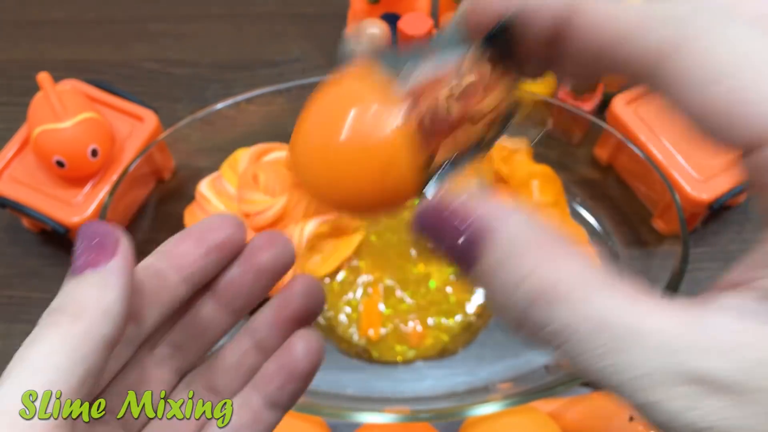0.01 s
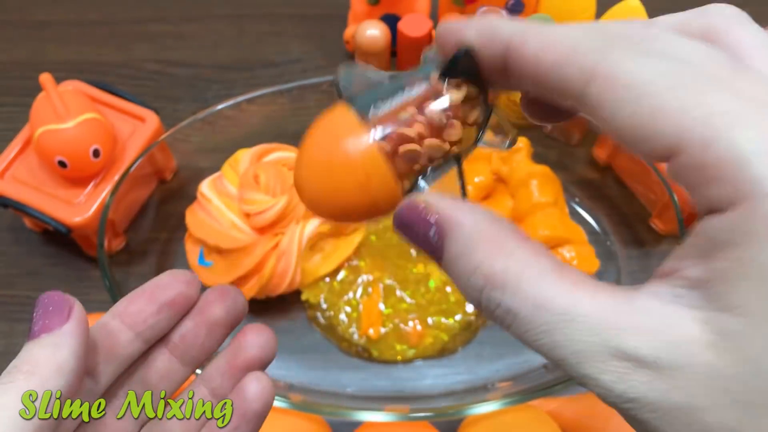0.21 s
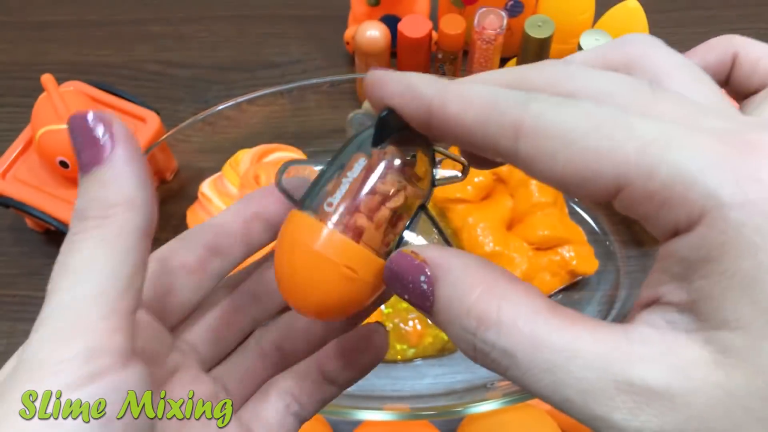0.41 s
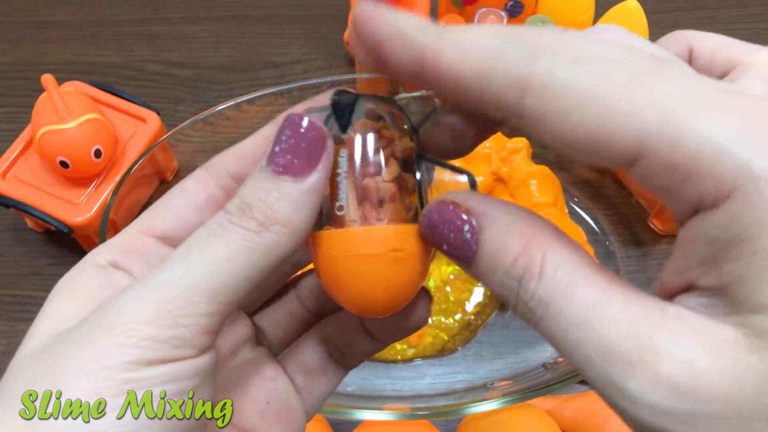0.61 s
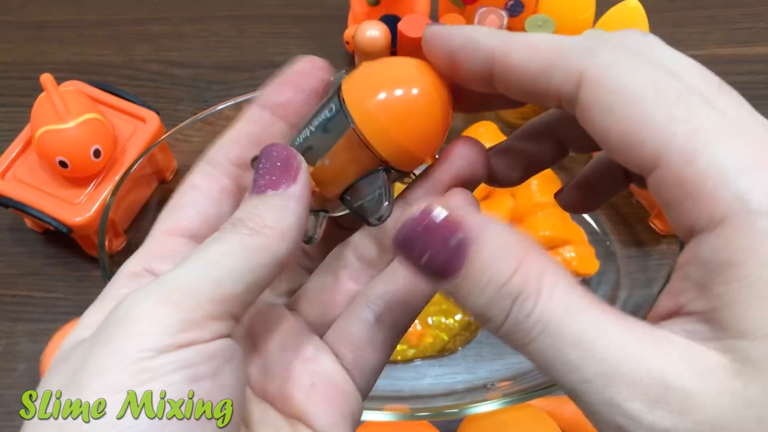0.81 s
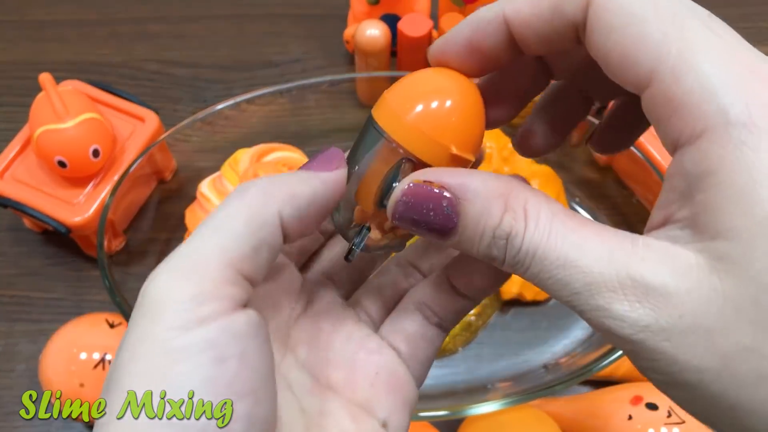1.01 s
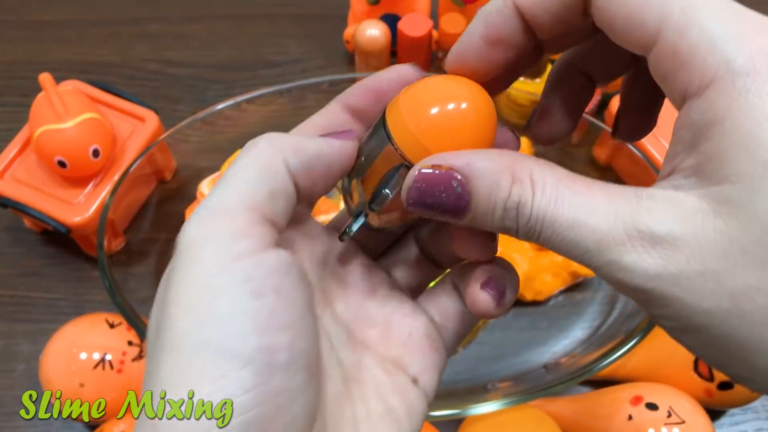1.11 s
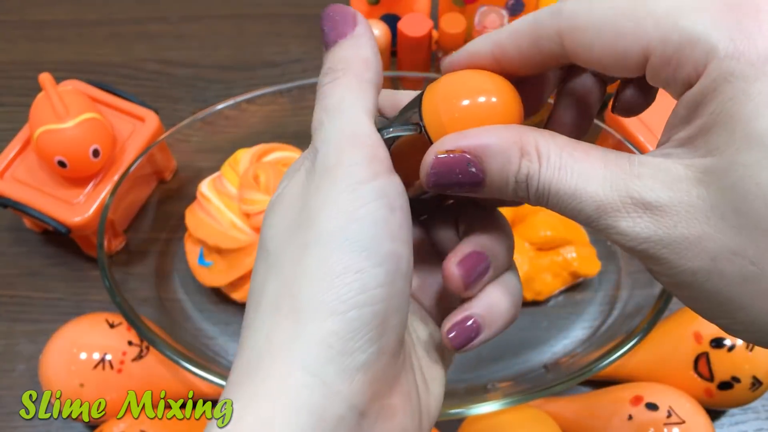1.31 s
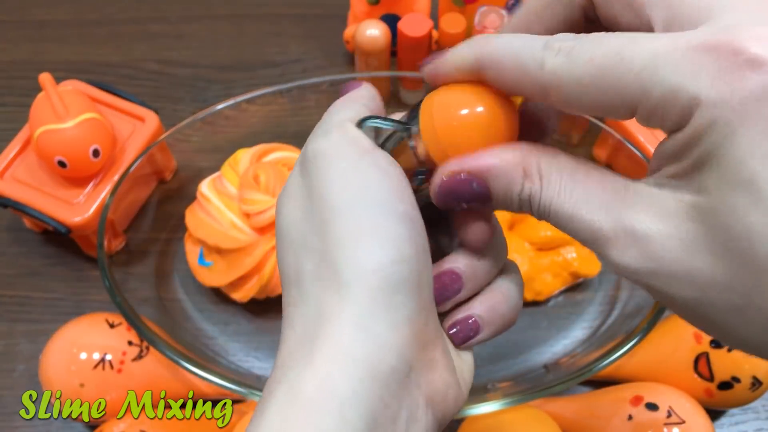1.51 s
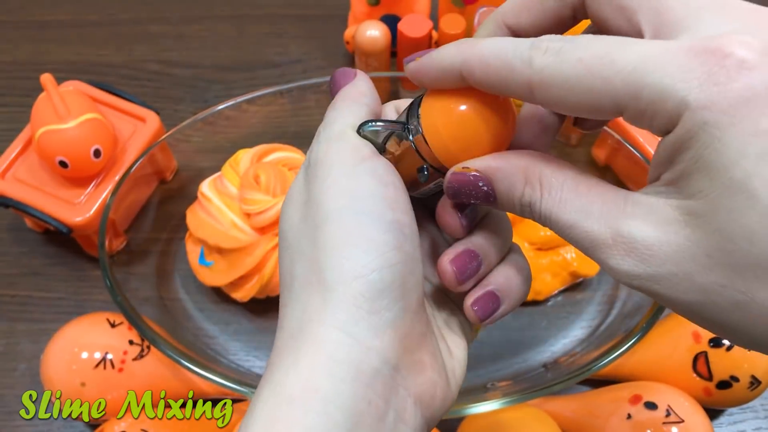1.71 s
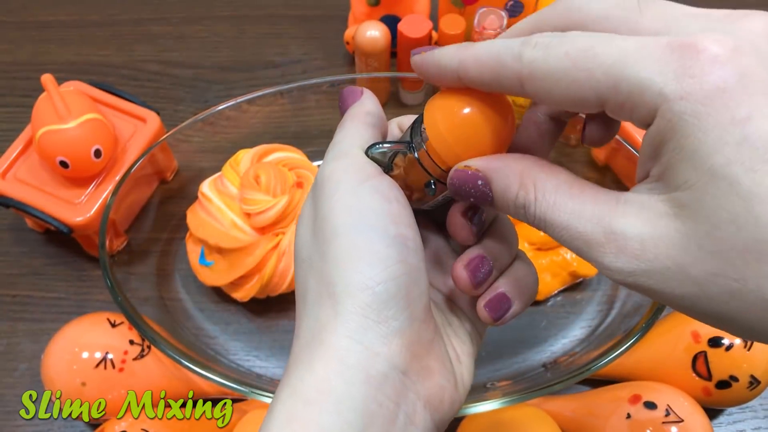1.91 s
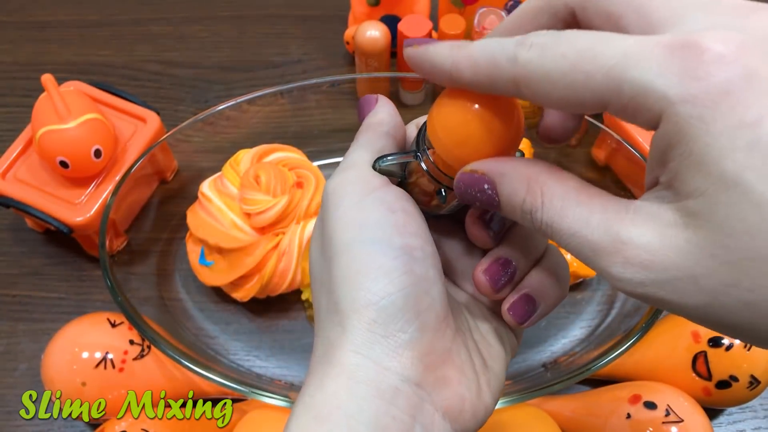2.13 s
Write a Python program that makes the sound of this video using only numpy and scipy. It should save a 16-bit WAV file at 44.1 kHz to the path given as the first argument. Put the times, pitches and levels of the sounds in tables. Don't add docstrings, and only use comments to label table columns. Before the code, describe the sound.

A small hard plastic capsule full of tiny pieces is rattled in four quick, bright shakes close to the microphone, then slowly turned with sparse ticks, before its cap snaps off and clatters, in a quiet humming room.

```python
import sys
import numpy as np
from scipy import signal
from scipy.fft import rfft, irfft
from scipy.io import wavfile

SR = 44100
rng = np.random.default_rng(int(sys.argv[2]) if len(sys.argv) > 2 else 0)


def wrap_up_sound(samples):
    columns = np.atleast_2d(samples).T
    tamed = np.clip(columns, -1, 1)
    steps = np.round(tamed * 32767).astype(np.int16)
    wavfile.write(sys.argv[1], SR, steps)


def level_to_linear(level):
    exponent = np.asarray(level, float) / 20
    return 10 ** exponent


N = 97020
SCENE_CHANGE_S = 0.76


def rms_one(x):
    return x / np.sqrt(np.mean(x ** 2) + 1e-20)


def butter(x, order, hz, kind="low"):
    return signal.sosfilt(signal.butter(order, hz, kind, fs=SR, output="sos"), x)


def in_time(rows):
    s, db = np.transpose(rows)
    return level_to_linear(np.interp(np.arange(N) / SR, s, db, left=-200, right=-200))


def coloured(x, points):
    hz, db = np.transpose(points)
    f = np.arange(N // 2 + 1) * SR / N + 1
    gain = level_to_linear(np.interp(np.log(f), np.log(hz), db))
    return irfft(rfft(x) * gain, N)


def ring(clicks, hz, t60):
    r = level_to_linear(-60 / (t60 * SR))
    w = 2 * np.pi * hz / SR
    return signal.lfilter([1, 0, -1], [1, -2 * r * np.cos(w), r * r], clicks + 1e-18) / 2


def grains(per_s, spread_db):
    size = level_to_linear(spread_db * np.minimum(rng.exponential(1, N), 4.5))
    size = size * rng.choice([-1, 1], N)
    return size * (rng.random(N) < per_s / SR)


def contacts(rows, crack_hz, partner):
    out = np.zeros(N + 1000)
    t = np.arange(800) / SR
    noise = butter(rng.standard_normal((len(rows), 800)), 2, crack_hz, "band")
    luck = rng.random((len(rows), 2))
    for (s, db, hz, crack_db, swell), crack, (pick, turn) in zip(rows, noise, luck):
        shape = t / swell * np.exp(1 - t / swell)
        first = np.sin(2 * np.pi * hz * t)
        second = level_to_linear(-8.5) * np.sin(2 * np.pi * (partner(hz, pick) * t + turn))
        crack = 1.214 * crack / np.max(np.abs(shape * crack))
        i = int(s * SR)
        out[i:i + 800] += level_to_linear(db) * shape * (first + second + level_to_linear(crack_db) * crack)
    return out[:N]


# pitch in Hz, level in dB per Hz.
ROOM_COLOUR = [(15, -36), (25, -8.5), (89, -1.5), (451, -14), (503, -16.5), (775, -18.5), (840, -21),
               (5730, -29), (16000, -33.5)]


def room_tone():
    hum_hz, hum_width_hz = 129.2, 3.5
    hum = rms_one(ring(rng.standard_normal(N), hum_hz, 2.5 / hum_width_hz))
    broad = rms_one(coloured(rng.standard_normal(N), ROOM_COLOUR))
    return level_to_linear(-65) * broad + level_to_linear(-73) * hum


def room_response():
    early_t60_s, late_t60_s, wall_cut_hz = 0.0061, 0.65, 7800
    t = np.arange(SR) / SR
    early = rng.standard_normal(SR) * level_to_linear(-60 * t / early_t60_s) * (t > 0.0012)
    r = np.exp(-2 * np.pi * wall_cut_hz / SR)
    late = signal.lfilter([1], [1, -r], rng.standard_normal(SR))
    late = late * level_to_linear(-60 * t / late_t60_s) * (1 - np.exp(-t / 0.0019))
    early = early / np.sqrt(np.sum(early ** 2))
    late = late / np.sqrt(np.sum(late ** 2))
    return level_to_linear(-16) * early + level_to_linear(-13) * late


# time in seconds, level in dB.
HAND_LEVEL = [(0.17, -86), (0.33, -67), (0.468, -61), (0.588, -62.5), (0.722, -65), (0.765, -62)]


def hand():
    noise = butter(rng.standard_normal(N), 1, 433)
    noise = rms_one(butter(noise, 2, 154, "high"))
    lumps_hz, lumps_db = 25, 3
    lumps = rms_one(butter(rng.standard_normal(N), 2, lumps_hz))
    return in_time(HAND_LEVEL) * level_to_linear(lumps_db * lumps) * noise


def puff():
    start_s, start_hz = 1.692, 625
    t = np.maximum(np.arange(N) / SR - start_s, 0)
    swing = np.sin(2 * np.pi * 0.67 * np.log1p(start_hz * 3.8 * t))
    return level_to_linear(-36) * swing * np.exp(-t / 0.0023)


# pitch in Hz, level in dB, time to fall 60 dB in seconds.
CAP_TONES = [(1200, -26, 0.0063), (2000, -2, 0.0058), (2500, -4, 0.0025), (3000, -11, 0.0056),
             (4150, -4, 0.004), (5400, -10, 0.002), (7800, -3.5, 0.0026), (9450, -21, 0.0014),
             (11200, -14, 0.0044), (14500, -8, .002)]
# time in seconds, level in dB.
CAP_SLIDES = [
    [(1.675, -71), (1.7, -46), (1.71, -40.5), (1.73, -47.5), (1.852, -57), (1.916, -65), (2.03, -93.5)],
    [(2.035, -75), (2.07, -60.5), (2.115, -73), (2.135, -62), (2.2, -74)],
]


def cap_slide():
    per_s, spread_db = 2800, 4
    chatter = sum(ring(grains(per_s, spread_db), hz, t60) * level_to_linear(db) for hz, db, t60 in CAP_TONES)
    scrape = np.diff(grains(3 * per_s, spread_db), prepend=0)
    loudness = sum(in_time(rows) for rows in CAP_SLIDES)
    return (rms_one(chatter) + level_to_linear(-8) * rms_one(scrape)) * loudness


# start in seconds, peak level in dB, ring pitch in Hz,
# crack level in dB compared with the ring, swell time in seconds.
CAP_KNOCKS = [(1.5168, -38.5, 2200, -11, 0.0003), (1.5172, -42.5, 14500, -4.5, 0.00016),
              (1.667, -48, 3460, -4, 0.0005), (1.8405, -45, 11800, -2, 0.00069),
              (2.1213, -32, 5300, 6.5, 0.00027), (1.768, -26.5, 2233, -7.5, 0.0011),
              (1.788, -46, 7500, -14, .001), (1.7992, -25, 2300, -7.5, 0.00052),
              (1.7998, -33, 4150, -2, 0.00048), (1.802, -38, 7800, -7, 0.00059),
              (1.8218, -33.5, 11200, -19, 0.0008), (1.8222, -36, 14500, -8, 0.00043),
              (1.823, -42.5, 7670, -8, 0.00092), (1.8285, -42.5, 2450, -5, 0.0021),
              (1.8505, -47.5, 2245, -18, 0.0038), (1.8605, -37.5, 2170, -8, 0.0019),
              (1.8885, -46.5, 4370, 4.5, 0.00066), (1.9075, -47, 2600, 3, 0.00047),
              (2.0485, -50.5, 2030, 4, 0.00051), (2.0616, -44, 2500, 0, 0.00029),
              (2.1208, -31, 2900, -5.5, 0.0005), (2.1665, -42, 2320, -3, 0.00054),
              (2.0908, -52, 2380, 2, 0.0011), (2.1062, -60, 5900, 0, .0005),
              (2.1785, -43, 2280, 2.5, 0.0014)]
# start in seconds, peak level in dB, ring pitch in Hz,
# crack level in dB compared with the ring, swell time in seconds.
CAP_SNAP = [
    (1.7, -54, 2500, -8, 0.0021),
    (1.7028, -26, 3000, -29, 0.0002),
    (1.7046, -17, 4240, 1.5, 0.00038),
    (1.7048, -32, 1200, 12, 0.00074),
    (1.7064, -19.5, 5400, 4, 0.00029),
    (1.7098, -30.5, 5500, 3.5, 0.00052),
]


def cap_knocks():
    def neighbour(hz, pick):
        return hz * (1.13 + 0.22 * pick)
    return contacts(CAP_KNOCKS, (1200, 8500), neighbour) + contacts(CAP_SNAP, (2500, 16900), neighbour)


# pitch in Hz, level in dB per Hz.
SHELL_COLOUR = [(200, -21), (600, -34), (1300, -26), (2500, -17), (5500, -10), (8600, -5), (13500, -5),
                (16000, -8.5)]


def pieces(rows, per_s, spread_db):
    t = np.arange(N) / SR
    gain = 0
    for s, db, gather, scatter in rows:
        gain = gain + level_to_linear(db) * np.exp(-np.abs(t - s) / np.where(t < s, gather, scatter))
    clicks = grains(per_s, spread_db)
    dealt = rng.integers(0, 24, N)
    rings = 0
    for k, hz in enumerate(np.geomspace(900, 16000, 24)):
        rings = rings + ring(clicks * (dealt == k), hz, 7 / hz) * np.sqrt(hz)
    bare_clicks = 0.09 * np.sqrt(4000) * clicks
    return gain * rms_one(coloured(rings + bare_clicks, SHELL_COLOUR))


# time in seconds, level in dB,
# gathering time in seconds, scattering time in seconds.
TUMBLE_SWARMS = [
    (1.02, -44.5, 0.016, 0.018),
    (1.137, -50, 0.018, 0.011),
    (1.31, -52, 0.0052, 0.016),
    (.81, -58.5, 0.16, 0.026),
    (1.37, -47.5, 0.013, 0.022),
    (1.43, -48, 0.028, 0.03),
    (2.076, -64, .004, 0.0054),
]


def tumbles():
    return butter(pieces(TUMBLE_SWARMS, per_s=4000, spread_db=2.4), 1, 4000)


# start in seconds, peak level in dB, ring pitch in Hz.
SHELL_TICKS = [(0.0361, -51.5, 8140), (0.8517, -50, 4430), (0.8535, -44.5, 11200), (0.8602, -40, 11440),
               (0.8702, -35, 8400), (0.89, -48.5, 8900), (0.981, -37.5, 9300), (0.995, -37, 7800),
               (1.0201, -25, 9370), (1.0309, -41, 9300), (1.048, -41, 9100), (1.0536, -38.5, 11000),
               (1.065, -43.5, 7350), (1.1003, -47.5, 8860), (1.136, -44.5, 5800), (1.1634, -47, 7800),
               (1.1692, -49.5, 4930), (1.1938, -29.5, 10480), (1.2521, -38.5, 9640), (1.3012, -45.5, 10300),
               (1.305, -47.5, 4800), (1.3395, -39, 5430), (1.3545, -31, 11200), (1.3646, -40.5, 15000),
               (1.39, -30.5, 11200), (1.4057, -49, 11800), (1.4228, -46, 5830), (1.4436, -44.5, 8900),
               (1.4502, -47.5, 3500), (1.484, -46, 4350)]
# start in seconds, peak level in dB, ring pitch in
# Hz.
MORE_SHELL_TICKS = [(0.8822, -61, 4500), (0.9053, -57, 8400), (0.9414, -58, 8600), (0.9844, -59, 4900),
                    (0.999, -50, 8360), (1.0029, -45, 6940), (1.0124, -47, 7140), (1.0179, -35, 10800),
                    (1.0231, -56, 9800), (1.0267, -47, 8250), (1.041, -43, 8050), (1.0776, -57, 7800),
                    (1.083, -55, 7800), (1.1113, -56, 6400), (1.124, -53, 7100), (1.1388, -41, 10800),
                    (1.143, -52, 6000), (1.1725, -54, 5100), (1.2037, -54, 5200), (1.3677, -41, 5140),
                    (1.3761, -48, 4700), (1.395, -41, 10500), (1.4136, -55, 5300), (1.426, -46, 5450),
                    (1.429, -51, 7800), (1.437, -52, 5300), (1.4405, -47, 5600), (1.4592, -48, 4200),
                    (1.5205, -49.5, 9700), (1.5597, -54, 4330)]
# start in seconds, peak level in dB, ring pitch in Hz.
STRAGGLERS = [
    (.582, -34, 11200),
    (.613, -34, 4420),
    (.6205, -30, 15000),
    (.628, -29.5, 14500),
    (.801, -60, 5500),
    (.808, -58, 4970),
    (.8215, -61, 5240),
]


def ticks():
    def shell_tone(hz, pick):
        tone_hz = np.interp(pick, [0, 1], (4630, 5300))
        return tone_hz if hz > 7000 else 2 * tone_hz
    late = [(*row, -1.5, 0.00022) for row in STRAGGLERS]
    single = [(*row, -1.5, 0.0002) for row in SHELL_TICKS + MORE_SHELL_TICKS]
    crack_hz = (3870, 16600)
    return contacts(late, crack_hz, shell_tone) + contacts(single, crack_hz, shell_tone)


# time in seconds, level in dB,
# gathering time in seconds, scattering time in seconds.
SHAKE_SURGES = [(.187, -48, 0.0016, 0.0064), (.204, -34, .003, 0.01), (0.22, -34, 0.0061, 0.00094),
                (.227, -33, .001, 0.0011), (.236, -31, 0.0032, 0.0011), (.241, -22, 0.0022, 0.001),
                (.246, -31, 0.00065, 0.0018), (.256, -36.5, 0.0018, 0.0018), (.308, -39, 0.00044, 0.007),
                (.318, -30.5, 0.0045, 0.0054), (.328, -39.5, 0.0046, 0.0052),
                (.3445, -26.5, 0.0013, 0.0021), (.3505, -23.5, 0.0017, 0.0034), (.359, -34, 0.002, 0.01),
                (.412, -35, 0.0035, 0.0045), (.421, -35, 0.0071, 0.0052), (.436, -30, 0.0011, 0.0026),
                (.446, -26.5, 0.0063, 0.0067), (.504, -34, 0.0052, 0.0068), (.523, -33.5, 0.0072, 0.0037),
                (0.5295, -26.5, 0.0027, 0.0067), (.540, -45, 0.002, 0.0023), (.604, -39.5, 0.011, 0.011),
                (.614, -53, 0.00054, 0.0043)]


def shaken_load():
    return pieces(SHAKE_SURGES, per_s=9000, spread_db=2.3)


# start in seconds, peak level in dB, ring pitch in Hz.
HARD_STRIKES = [(0.1855, -53, 8600), (0.192, -43, 8650), (0.204, -29.5, 9400), (0.2073, -29, 7200),
                (0.2108, -29, 12600), (0.2187, -21, 9200), (0.2363, -23, 8300), (0.2389, -17.5, 15100),
                (0.2415, -19.5, 8350), (0.2435, -22, 14100), (0.2456, -19, 8900), (0.2557, -30, 8400),
                (0.307, -37, 8700), (0.3121, -29, 10000), (0.316, -34, 14700), (0.3189, -36, 11700),
                (0.3204, -27.5, 8000), (0.3266, -31, 9500), (0.3293, -26, 7500), (0.3432, -32, 10800),
                (0.345, -20, 11000), (0.3509, -16, 12200), (0.357, -28, 7500), (0.3592, -25, 7650),
                (0.411, -37, 7950), (0.4155, -34, 11500), (0.42, -35, 14900), (0.4244, -32, 8300),
                (0.4356, -31, 9000), (0.442, -19.5, 14300), (0.4446, -24, 12800), (0.4465, -20, 14800),
                (0.449, -22.5, 8340), (0.504, -35, 8500), (0.504, -32, 8200), (0.5143, -29, 7040),
                (0.5233, -31, 14900), (0.5292, -26, 8600), (0.5311, -14.5, 8830), (0.531, -29, 8670),
                (0.537, -32, 8950), (0.5417, -33, 10600)]


def impacts():
    def neighbour(hz, pick):
        return hz * (1.15 + 0.3 * pick) ** (1 if hz < 10500 else -1)
    rows = [(*row, -1.5, 0.00023) for row in HARD_STRIKES]
    return contacts(rows, (6000, 16600), neighbour)


def scene():
    near = level_to_linear(-2.5) * (shaken_load() + tumbles()) + impacts()
    near = near + ticks() + cap_slide_and_knocks() + puff()
    before = np.clip((SCENE_CHANGE_S - np.arange(N) / SR) / 0.0033, 0, 1)
    echo = room_response()
    wet_before = before * signal.fftconvolve(near * before, echo)[:N]
    wet_after = signal.fftconvolve(near * (1 - before), echo)[:N]
    return (near + wet_before + wet_after + before * hand() + room_tone())[None]


def cap_slide_and_knocks():
    return cap_slide() + cap_knocks()


def roll_off(x):
    return signal.sosfilt(signal.butter(12, 17000, fs=SR, output="sos"), x)


def record(dry):
    x = butter(dry, 4, 45.4, "high")
    notch_hz, notch_width_hz, notch_depth = 6110, 233, 0.31
    x = x - notch_depth * signal.lfilter(*signal.iirpeak(notch_hz, notch_hz / notch_width_hz, SR), x)
    x = signal.sosfilt(signal.cheby2(16, 24, 16000, fs=SR, output="sos"), x)
    return roll_off(x)


dry = scene()
out = record(dry)
wrap_up_sound(out)
```